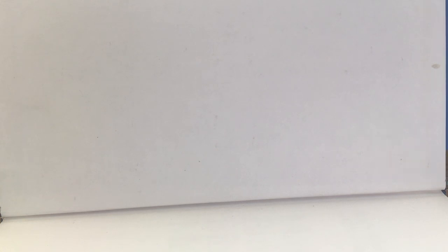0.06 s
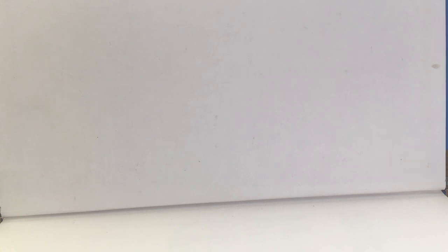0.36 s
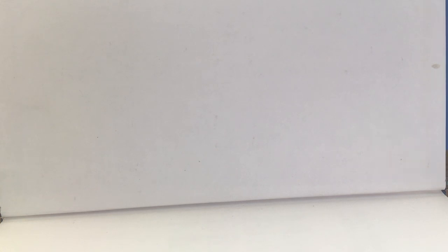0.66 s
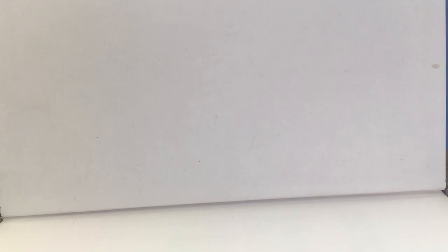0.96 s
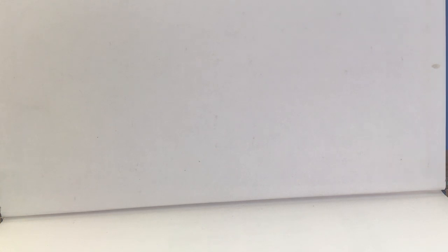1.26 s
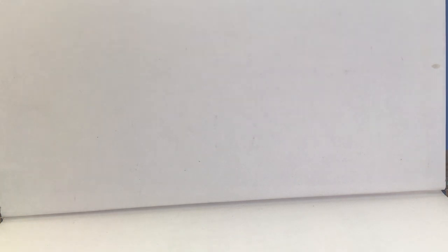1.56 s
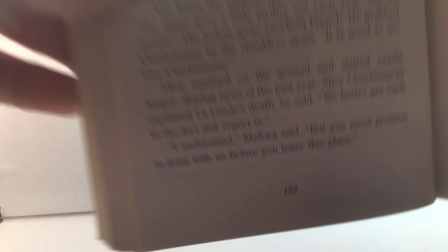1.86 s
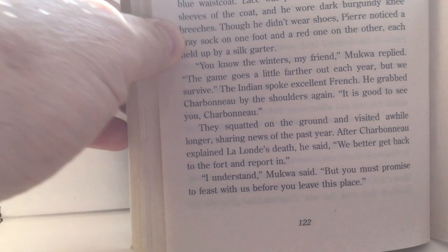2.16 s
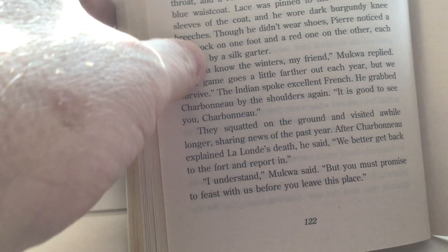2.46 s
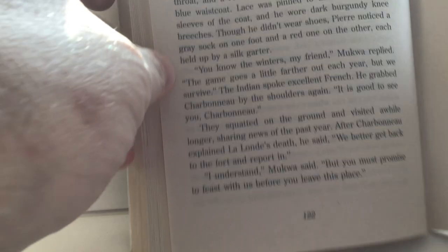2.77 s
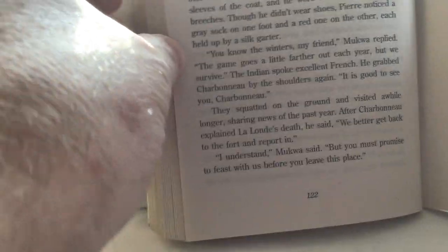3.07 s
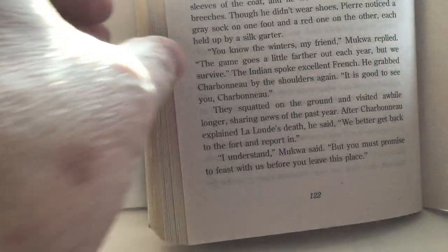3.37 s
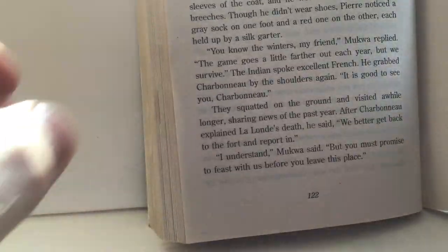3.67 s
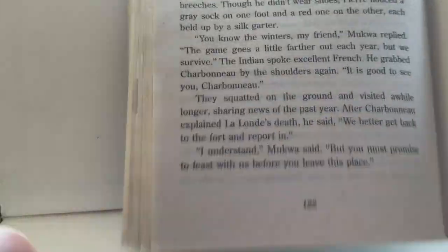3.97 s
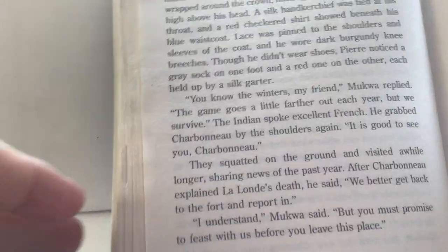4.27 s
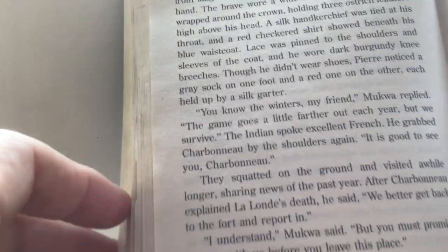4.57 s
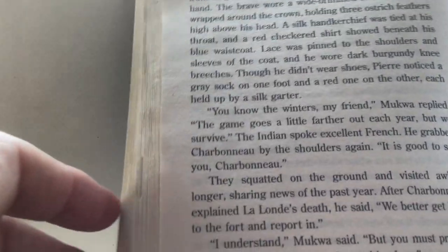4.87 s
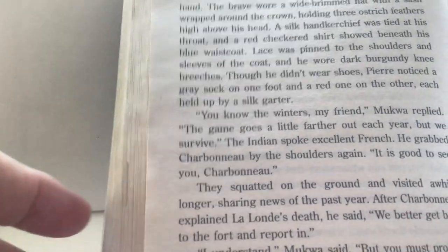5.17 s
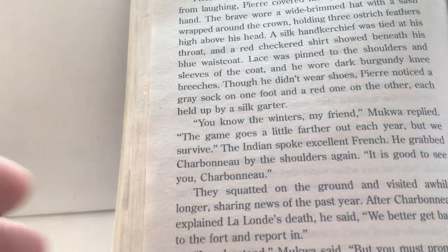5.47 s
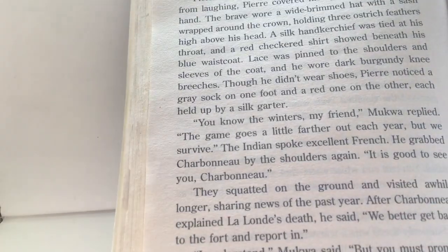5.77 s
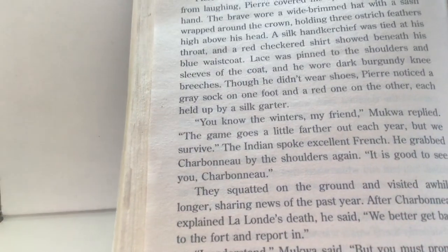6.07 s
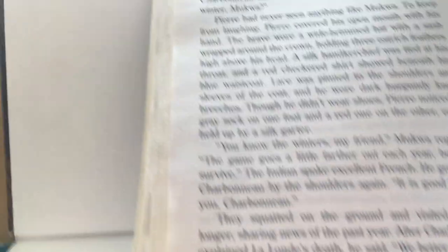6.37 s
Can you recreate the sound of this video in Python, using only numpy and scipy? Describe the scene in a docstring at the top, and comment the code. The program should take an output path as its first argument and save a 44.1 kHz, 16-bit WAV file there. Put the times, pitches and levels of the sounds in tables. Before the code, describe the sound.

Faint paper rubbing and two tiny taps lead to a sharp clatter as a paperback lands on a desk nearby. Hands then move the book about, giving clusters of hollow bumps, soft dragging, small paper flicks and short page swishes. A short scrape of the cover comes last, over the low hum of a quiet room.

```python
"""A paperback is stood up on a desk, close by, in a quiet room. First fingers rub faintly over its paper,
with two light taps around 1 s. At 1.8 s it clatters down in a run of bright slaps. As it is opened and
shifted, paper rubs and ticks, and the book bumps the desk: each bump crosses the top as bending waves,
treble first, and leaves a low boom. Pages swish around 4 s, a fingertip runs along their edges at 5 s,
and at 6.25 s the cover starts to skid across the desk."""
import sys
import numpy as np
from scipy import signal
from scipy.fft import rfft, irfft, next_fast_len
from scipy.io import wavfile
from scipy.ndimage import uniform_filter1d, map_coordinates

SR = 44100
rng = np.random.default_rng(int(sys.argv[2]) if len(sys.argv) > 2 else 0)


def unload_wav(signal):
    """Save mono or channel-first audio to the path in sys.argv[1] as 16-bit WAV at rate SR, clipped to [-1, 1]."""
    wavfile.write(
        sys.argv[1],
        SR,
        np.round(np.clip(np.atleast_2d(signal).T, -1, 1) * 32767).astype(np.int16),
    )


N = 282598
TIME = np.arange(N) / SR

# Tone colours, as EQ curves. Each row: frequency in Hz, relative level in dB.
AIR_EQ = [(15, -60), (25, -47), (59, -2), (165, -4), (276, -8), (342, -8.5), (449, -15.5), (513, -15),
          (981, -27), (1060, -26.5), (1390, -29), (2150, -27.5), (3580, -31.5), (9210, -35), (15800, -42.5)]  # the room's murmur
COVER_EQ = [(59, -41), (100, -5.5), (605, -3), (687, -2), (764, -1), (1170, -6.5), (1380, -11.5),
            (2110, -10), (6350, -32.5), (9110, -23), (15800, -38)]  # the cover scraping over the desk
PAGES_EQ = [(100, -3), (500, 9.5), (1200, 5.5), (2400, 3), (5000, -0.5), (6500, -2.5), (9000, -3.5),
            (15500, -6)]  # page brushing on page
DRAG_EQ = [(60, -17.5), (110, 1), (200, -3.5), (280, -4), (340, -1), (430, 4.5), (510, -7), (590, 2),
           (720, -4.5), (1000, -8.5), (1500, -14.5), (3000, -43.5)]  # the book's edge dragging on the desk
SKIN_EQ = [(400, -21.5), (900, -1), (1450, 1.5), (1750, 1), (2350, 4), (3100, -5.5), (3900, -5),
           (5200, -12), (8000, -24), (15000, -33)]  # skin rasping on paper
HISS_EQ = [(1500, -15.5), (3000, -1), (3900, 1.5), (5000, 2.5), (6500, -2), (9500, 1), (12000, -2.5),
           (15500, -2)]  # the hiss of rubbed paper
DESK_WAVE_EQ = [(25, -68.5), (60, -8), (115, 3), (165, -3), (260, -1), (450, -3), (800, 0), (1100, -7.5),
                (2000, -4), (3000, -9.5), (5000, -8.5), (15000, -12)]  # bending waves in the desk top
CRACK_EQ = [(100, -35), (400, -8), (1000, 2), (1450, 0), (1850, -6), (2500, 1.5), (3300, -2.5),
            (4300, -2.5), (8000, -5), (10500, -8), (12500, -5.5), (14500, -2.5), (16000, -3.5)]  # a slap's bright crack
BODY_EQ = [(40, -36), (100, -16), (190, 2.5), (270, -11.5), (400, 3.5), (800, 0), (1500, -9), (4000, -37)]  # a slap's low body
# The room's reverb. Each row: frequency in Hz, t60 (time to fade by 60 dB) in seconds.
ROOM_DECAY = [(80, 0.76), (400, 0.28), (1200, 0.22), (2500, 0.39), (6000, 0.34), (15000, 0.12)]
# Resonances. Each row: centre in Hz, width in Hz, relative gain in dB.
PAGE_EDGE_MODES = [(646, 87, 5.5), (3580, 340, 0)]  # the stack of page edges
DESK_MODES = [(116, 93, 5.5), (283, 64, -1.5), (485, 120, 5.5), (727, 160, -6.5), (1370, 69, -21),
              (1980, 120, -21), (2630, 59, -26.5)]  # the desk top
# Ringing tones. Each row: pitch in Hz, relative level in dB, t60 in seconds.
TAP_MODES = [(1000, -14, 0.061), (1465, -4.5, 0.11), (2100, -4, 0.053)]  # the hollow note of a tap
BOOM_MODES = [(81, -1, .2), (111.5, 12, 0.11)]  # the desk's lowest modes
SLAP_MODES = [(195, -5.5, 0.34), (378, 6, 0.081), (485, 2.5, 0.11), (540, 0, .14), (817, -0.5, 0.097),
              (1123, 1, .14), (1160, 0, 0.099), (1465, 1, 0.12), (1610, -4.5, .14), (2350, -5, 0.2),
              (2435, -11, .18), (2640, -5, .19), (2760, -10, .18), (3944, -11, .12), (4109, -5.5, .11),
              (4695, -8, .11), (5875, -11.5, .11)]  # the surroundings after a hard slap
# A fingertip's run along the page edges. Each row: time in seconds, level in dB.
FINGERTIP_FADE = [(4.9, -80), (4.96, -69), (5.04, -68), (5.13, -61.5), (5.2, -70), (5.26, -99)]
# Pages brushing past each other. Each row: start, peak and end in seconds, level in dB.
PAGE_SWISHES = [(3.712, 3.762, 3.82, -52.5), (3.71, 3.784, 3.81, -48.5), (4.019, 4.04, 4.076, -49),
                (4.013, 4.1, 4.164, -46.5)]
# Strokes of the hand. Each row: time of the hardest push, build-up and easing in seconds,
# then the relative levels of drag, skin rasp and paper hiss in dB.
HAND_STROKES = [(0.20, 0.0086, 0.017, -80, -76.5, -90), (0.40, 0.013, 0.014, -76, -76, -88),
                (0.485, 0.016, 0.021, -65.5, -64.5, -70.5), (0.55, 0.054, 0.081, -85, -72, -82),
                (0.70, 0.019, 0.019, -78, -71, -89), (0.93, 0.28, 0.033, -87, -81.5, -78),
                (1.19, 0.031, 0.23, -75, -85, -79), (1.47, 0.23, 0.18, -73.5, -64, -76),
                (1.645, 0.26, 0.047, -72, -71, -67.5), (1.79, 0.11, 0.044, -74, -70, -78.5),
                (2.046, 0.017, 0.06, -61, -63, -71.5), (2.29, 0.22, 0.15, -60, -69.5, -73.5),
                (2.474, 0.023, 0.052, -50.5, -58, -62), (2.56, 0.018, 0.084, -67, -78, -76),
                (2.681, 0.057, 0.072, -67, -64, -66), (2.961, 0.18, 0.065, -55, -59, -68.5),
                (3.064, 0.041, 0.055, -58.5, -57.5, -66.5), (3.672, 0.032, .02, -65, -63, -71),
                (3.98, 0.04, 0.014, -62, -71, -83), (4.135, .025, 0.063, -58.5, -73, -87),
                (4.23, 0.037, 0.099, -72.5, -75.5, -74), (4.32, 0.061, .08, -64.5, -69, -88),
                (4.443, 0.041, 0.17, -53.5, -57.5, -68), (4.663, 0.033, 0.093, -54.5, -57.5, -72),
                (4.83, 0.07, 0.11, -69.5, -66.5, -73.5), (4.975, 0.067, 0.071, -57.5, -60.5, -67.5),
                (5.13, 0.1, .1, -72.5, -65.5, -66.5), (5.38, 0.16, .015, -78, -77, -76),
                (5.93, 0.14, 0.038, -77, -85, -79), (6.19, 0.21, 0.14, -62, -67, -69.5)]
# Paper edges flicking. Each row: start in seconds, level in dB, centre in Hz, t60 in seconds.
PAPER_TICKS = [(2.065, -46.5, 3080, 0.0146), (2.282, -54, 3240, 0.02), (2.3274, -32, 1390, 0.045),
               (2.509, -45, 2630, 0.016), (2.758, -53.5, 8700, 0.16), (3.148, -42, 2980, 0.0086),
               (3.568, -53.5, 3500, 0.069), (3.659, -54.5, 3000, 0.036), (3.7115, -47.5, 2490, 0.098),
               (3.988, -56.5, 7000, 0.012), (4.429, -48, 2400, 0.022), (4.657, -39, 1680, 0.016),
               (5.286, -51.5, 3520, 0.031), (5.65, -52.5, 7700, 0.033), (5.861, -60.5, 3880, 0.028),
               (5.9591, -54.5, 1760, 0.022), (5.9683, -36.5, 4670, 0.0053), (6.091, -51.5, 5200, .008)]
# Light taps before the book comes down. Each row: start in seconds, level in dB.
LIGHT_TAPS = [(0.9751, -63), (1.1531, -62)]
# The handled book bumping the desk. Each row: start in seconds, level in dB,
# contact hardness as a treble cutoff in Hz, bass weight in dB.
DESK_BUMPS = [(1.154, -58, 706, 3), (1.851, -44.5, 400, 12), (2.0629, -44.5, 900, 8),
              (2.079, -42, 170, -11), (2.118, -46.5, 407, 3), (2.1695, -41, 1270, 12),
              (2.3109, -30.5, 705, -16), (2.3155, -25, 1640, 4.5), (2.3283, -21, 935, -5),
              (2.3317, -26.5, 635, -9), (2.393, -36, 750, 10), (2.421, -33, 1410, 6.5),
              (2.949, -41, 1000, -14), (3.7118, -39, 3250, -3), (3.7306, -37, 1480, 0),
              (3.7921, -39.5, 930, 11.5), (3.9903, -29.5, 1266, 10.5), (4.0014, -30, 980, 11.5),
              (4.027, -32.5, 1010, 3), (4.038, -35.5, 200, 10), (5.293, -48, 949.7, 15.5),
              (5.538, -58, 398, 5), (5.9667, -36, 2200, 6.5), (5.994, -41.5, 596, 3),
              (6.118, -38.5, 1190, 5.5)]
# The book clattering down. Each row: start in seconds, level in dB, t60 of the crack in seconds,
# level of the body against the crack in dB.
BOOK_SLAPS = [(1.8175, -16.5, .028, -18), (1.8262, -23, .032, -5), (1.8325, -32, .03, 0),
              (1.874, -28.5, .03, -3), (1.8812, -34.5, .025, 1), (1.8875, -29.5, .026, -3),
              (1.929, -54, .03, 11), (1.943, -43, .025, -2), (1.9475, -41, .022, 2), (1.958, -51, .02, -6)]

RUB_ATTACK_S, RUB_RELEASE_S = 0.016, 0.0084  # time constants: the skin takes hold, and lets go
RUB_SWELL_DB, RUB_SAG_DB = 8.5, 6.5  # pressure builds up to the hardest push, then eases
# Every slap also bumps the desk; the soft pages cushion the harder ones.
SLAP_BUMP_DB, SLAP_BUMP_GROWTH = -13, 0.57  # bump under a 0 dB slap; dB of bump per dB of slap
SLAP_HARD_HZ, SLAP_BASS_DB = 1050, -28


def amp(db):
    """Decibels to gain."""
    return 10 ** (np.asarray(db) / 20)


def unit(x):
    """x at rms 1."""
    return x / np.sqrt(np.mean(x ** 2) + 1e-20)


def along(points, hz):
    """Read a curve of (Hz, value) points on a log frequency axis."""
    f, v = np.transpose(points)
    return np.interp(np.log(hz + 1), np.log(f + 1), v)


def filtered(x, response):
    """x through a filter, given as gain against frequency."""
    size = next_fast_len(len(x) + SR // 4)
    return irfft(rfft(x, size) * response(np.fft.rfftfreq(size, 1 / SR)), size)[:len(x)]


def coloured(x, eq):
    """x through an EQ curve, at rms 1."""
    return unit(filtered(x, lambda hz: amp(along(eq, hz))))


def resonances(modes, hz):
    """Response of parallel band-passes, one for each (Hz, width, dB) mode."""
    return sum(amp(db) * 1j * hz * w / (c * c - hz * hz + 1j * hz * w) for c, w, db in modes)


def wobble(rate):
    """A smooth random curve, rate knots a second."""
    return map_coordinates(rng.standard_normal(int(N * rate / SR) + 4), [TIME * rate])


def add(track, s, sound):
    """Lay a sound into the track at s seconds."""
    part = track[round(s * SR):][:len(sound)]
    part += sound[:len(part)]


def room_tone(level_db=-68.5):
    """The bed: the room's steady low murmur and a faint hiss."""
    return amp(level_db) * coloured(rng.standard_normal(N), AIR_EQ)


def in_room(x, wet_db):
    """A sound with its own reverb tail, in which each frequency dies at its own speed."""
    hz, frame_s, noise = signal.stft(rng.standard_normal(SR // 2), SR, nperseg=256)
    decay = amp(-60 * frame_s / along(ROOM_DECAY, hz)[:, None])
    tail = signal.istft(noise * decay, SR, nperseg=256)[1]
    tail *= 1 - np.exp(-np.arange(len(tail)) / SR / 0.002)
    return x + amp(wet_db) * signal.fftconvolve(x, tail / np.linalg.norm(tail))[:len(x)]


def friction(eq, rate, grain_db):
    """Paper fibres catch and let go: tiny uneven slips, rate a second, over a smooth rush."""
    slips = (rng.random(N) < rate / SR) * rng.standard_normal(N)
    return coloured(rng.standard_normal(N) + amp(grain_db) * unit(slips), eq)


def flexing(x, depth_db):
    """The paper bends under the hand, so its resonances come and go."""
    bands = signal.stft(x, nperseg=512)[2]
    drift = uniform_filter1d(rng.standard_normal(bands.shape), size=4, axis=0)  # smooth in frequency
    drift = uniform_filter1d(drift, size=22, axis=1)  # and in time
    return unit(signal.istft(bands * amp(depth_db * unit(drift)), nperseg=512)[1][:N])


def skid(start_s=6.25, rise_s=0.091, full_db=-46.5, swell_db=25.5, judder_db=0.9):
    """The cover scrapes over the desk, swelling as it gathers speed."""
    speed = np.clip((TIME - start_s) / rise_s, 0, 1)
    db = full_db - swell_db * (1 - speed) + judder_db * wobble(80)
    return friction(COVER_EQ, rate=2100, grain_db=-13) * amp(db) * (speed > 0)


def fingertip():
    """Skin rasps along the stacked page edges, which colour it into a hollow hiss."""
    s, db = np.transpose(FINGERTIP_FADE)
    rasp = unit(filtered(rng.standard_normal(N), lambda hz: resonances(PAGE_EDGE_MODES, hz)))
    return rasp * amp(np.interp(TIME, s, db) + wobble(89)) * (TIME > s[0]) * (TIME < s[-1])


def swishes(depth_db=24):
    """Pages brush past each other in quick swells."""
    level = np.zeros(N)
    for start, peak, end, db in PAGE_SWISHES:
        swell_db = np.interp(TIME, [start, peak, end], [-depth_db, 0, -depth_db])
        level += amp(db + swell_db) * (TIME > start) * (TIME < end)
    brush = flexing(friction(PAGES_EQ, rate=5500, grain_db=-0.5), depth_db=2.5)
    return in_room(level * brush, wet_db=-23)


def stroke(t, build_up, easing):
    """Envelope around the hardest push at t = 0: the hand takes hold, presses, eases and lets go."""
    attack, release = (t + build_up) / RUB_ATTACK_S, (easing - t) / RUB_RELEASE_S
    grip = np.exp(np.minimum(attack, release).clip(-20, 0))
    return grip * amp(np.interp(t, [-build_up, 0, easing], [-RUB_SWELL_DB, 0, -RUB_SAG_DB]))


def rubs(drag_trim_db=1, judder_db=1.58, snag_db=-6):
    """The book's edge drags on the desk; skin rasps, hisses and snags on paper. The hand judders."""
    clock = TIME[::20]
    powers = sum((amp(layers_db)[:, None] * stroke(clock - push, build_up, easing)) ** 2
                 for push, build_up, easing, *layers_db in HAND_STROKES)
    drag_env, rasp_env, hiss_env = [np.interp(TIME, clock, np.sqrt(power)) for power in powers]
    judder = judder_db * wobble(70)
    drag = drag_env * amp(drag_trim_db + judder) * friction(DRAG_EQ, rate=550, grain_db=-8.5)
    rasp = rasp_env * amp(judder) * flexing(friction(SKIN_EQ, rate=900, grain_db=-6), depth_db=1.5)
    hiss = hiss_env * amp(judder / 2) * flexing(friction(HISS_EQ, rate=1300, grain_db=-6), depth_db=2.5)
    snags = hiss_env * amp(snag_db) * friction(HISS_EQ, rate=110, grain_db=15)
    return drag + rasp + hiss + snags


def ticks(relative_width=0.9, rise_s=0.00034, wet_db=-14):
    """A paper edge flicks: a short crackle around one pitch, its top end softened."""
    out, t = np.zeros(N), np.arange(SR // 4) / SR
    for s, db, centre_hz, t60 in PAPER_TICKS:
        burst = rng.standard_normal(len(t)) * amp(-60 * t / t60) * (1 - np.exp(-t / rise_s))
        band = [(centre_hz, relative_width * centre_hz, 0)]
        flick = filtered(burst, lambda hz: resonances(band, hz) / (1 + .25j * hz / centre_hz))
        add(out, s, amp(db) * in_room(flick / np.abs(flick).max(), wet_db))
    return out


def ringing(modes, t, blur_hz=24):
    """Damped modes, struck at new strengths each time; loose contact blurs their pitch."""
    hz, db, t60 = np.transpose(modes)[:, :, None]
    drift = np.cumsum(rng.standard_normal((len(modes), len(t))), axis=1)
    phase = 2 * np.pi * (hz * t + rng.random(hz.shape)) + drift * np.sqrt(2 * np.pi * blur_hz / SR)
    struck_db = db + 2 * rng.standard_normal(hz.shape)
    return np.sum(amp(struck_db - 60 * t / t60) * np.sin(phase), axis=0)


def taps(rise_s=.0007, click_db=-3, click_t60=0.047, wet_db=-13):
    """Two small hollow taps, each a light click with a short ring."""
    out, t = np.zeros(N), np.arange(SR // 4) / SR
    for s, db in LIGHT_TAPS:
        click = coloured(rng.standard_normal(len(t)), SKIN_EQ) * amp(click_db - 60 * t / click_t60)
        tap = (click + ringing(TAP_MODES, t)) * (1 - np.exp(-t / rise_s))
        add(out, s, amp(db) * in_room(tap, wet_db))
    return out


def bumps(spread=0.1475, front_hz=3500, scatter_db=-6, scatter_t60=0.082, ring_db=-3,
          boom_db=-18, boom_rise_s=0.013, wet_db=-15):
    """The desk's bending waves speed up with the root of frequency, so each bump's bass comes late."""
    out, t = np.zeros(N), np.arange(SR // 2) / SR
    hz = np.fft.rfftfreq(len(t), 1 / SR)
    slow_hz = np.minimum(hz, front_hz)  # everything above the front arrives at once
    travel = np.exp(-2j * np.pi * spread * (2 * np.sqrt(slow_hz) - slow_hz / np.sqrt(front_hz)))
    desk = amp(along(DESK_WAVE_EQ, hz)) * travel * (1 + amp(ring_db) * resonances(DESK_MODES, hz))
    boom = sum(amp(db - 60 * t / t60) * np.sin(2 * np.pi * f * t) for f, db, t60 in BOOM_MODES)
    boom *= 1 - np.exp(-(t / boom_rise_s) ** 2)
    landings = [(s, SLAP_BUMP_DB + SLAP_BUMP_GROWTH * db, SLAP_HARD_HZ, SLAP_BASS_DB)
                for s, db, *_ in BOOK_SLAPS]
    for s, db, hard_hz, bass_db in landings + DESK_BUMPS:
        contact = 1 / np.sqrt(1 + (hz / hard_hz) ** 6)  # a soft contact holds back the treble
        low_shelf = amp(bass_db / (1 + (hz / 180) ** 2))
        echoes = rng.standard_normal(len(t)) * amp(-60 * t / scatter_t60)  # off the desk's edges
        scatter = 1 + amp(scatter_db) * rfft(echoes) / np.linalg.norm(echoes)
        wave = irfft(desk * contact * low_shelf * scatter, len(t)) * (t < t[-1] / 2)
        bump = wave / np.abs(wave).max() + amp(boom_db + bass_db) * boom
        add(out, s, amp(db) * in_room(bump, wet_db))
    return out


def slaps(attack_s=.0004, swell_s=.003, body_t60=0.048, ring_db=-21, wet_db=-16):
    """The book smacks the desk: a bright crack, a slower low body, and the surroundings ring."""
    out, t = np.zeros(N), np.arange(SR // 2) / SR
    attack, swell = 1 - np.exp(-t / attack_s), 1 - np.exp(-t / swell_s)
    for s, db, crack_t60, body_db in BOOK_SLAPS:
        crack = coloured(rng.standard_normal(len(t)), CRACK_EQ) * amp(-60 * t / crack_t60) * attack
        body = coloured(rng.standard_normal(len(t)), BODY_EQ) * amp(body_db - 60 * t / body_t60)
        ring = amp(ring_db) * ringing(SLAP_MODES, t)
        add(out, s, amp(db) * in_room(crack + swell * (body + ring), wet_db))
    return out


def scene():
    """Hits and friction textures over the room tone, in mono."""
    hits = slaps() + bumps() + taps() + ticks()
    textures = rubs() + swishes() + fingertip() + skid()
    return (hits + textures + room_tone())[None]


def record(dry, low_cut_hz=45, top_hz=15900):
    """Roll off the deep bass and cut the very top steeply."""
    thinned = signal.sosfilt(signal.butter(2, low_cut_hz, "highpass", fs=SR, output="sos"), dry[0])
    return filtered(thinned, lambda hz: 1 / np.sqrt(1 + (hz / top_hz) ** 160))[None]


dry = scene()
out = record(dry)
unload_wav(out)
```